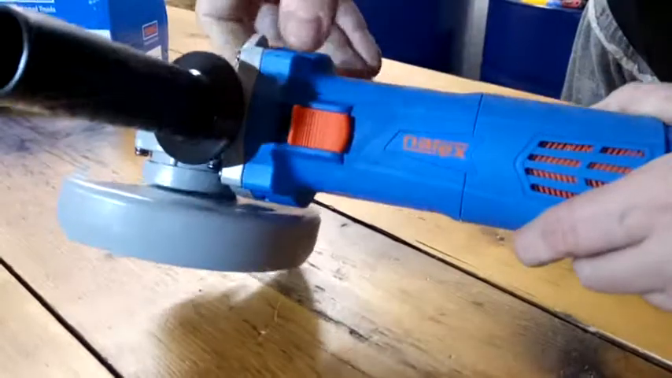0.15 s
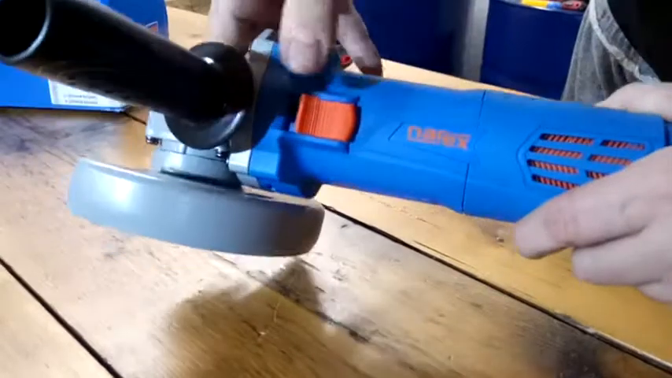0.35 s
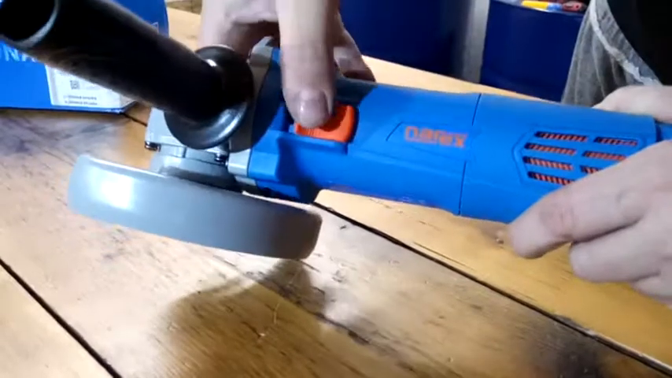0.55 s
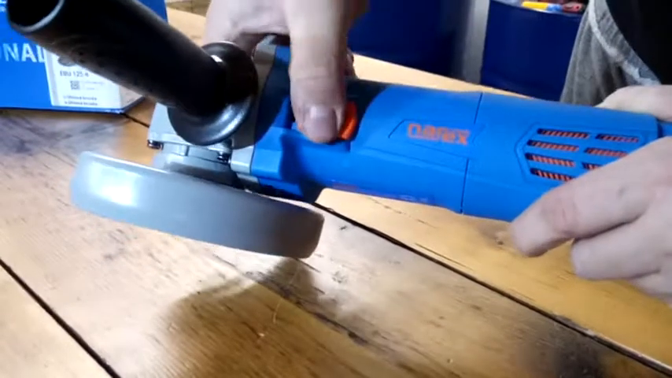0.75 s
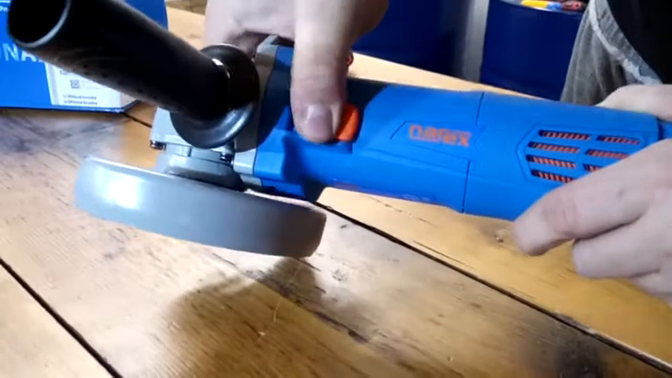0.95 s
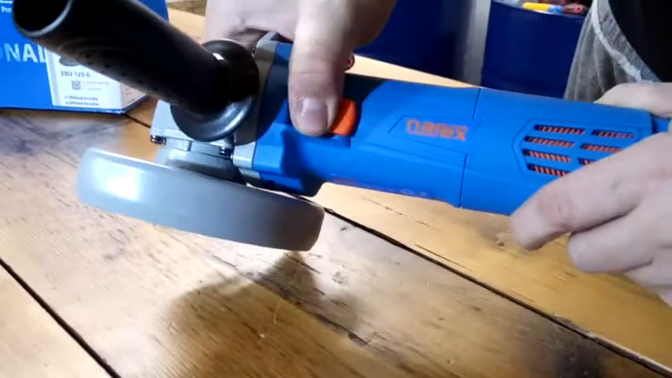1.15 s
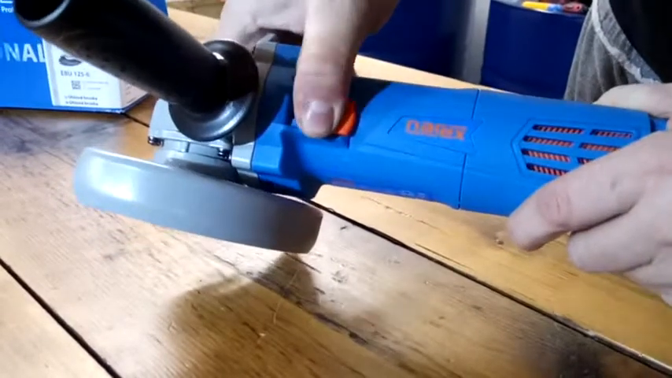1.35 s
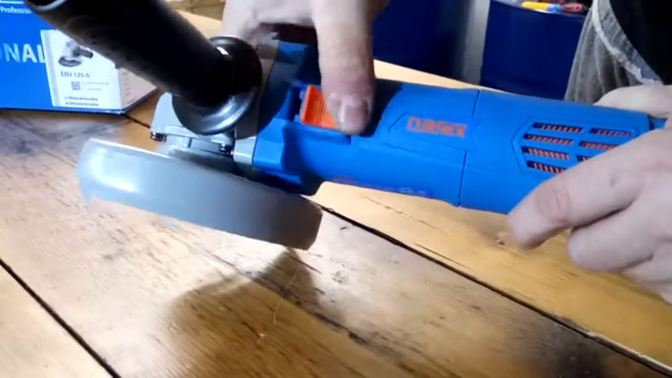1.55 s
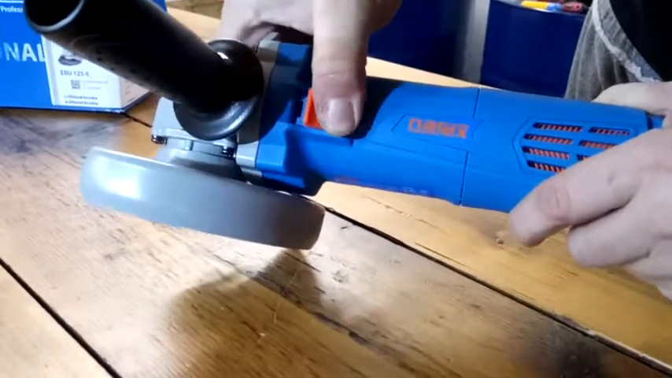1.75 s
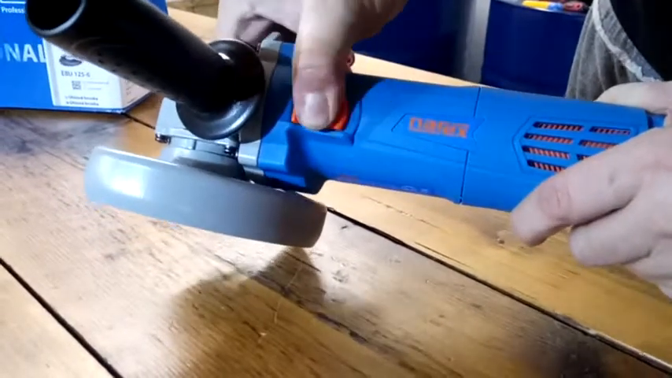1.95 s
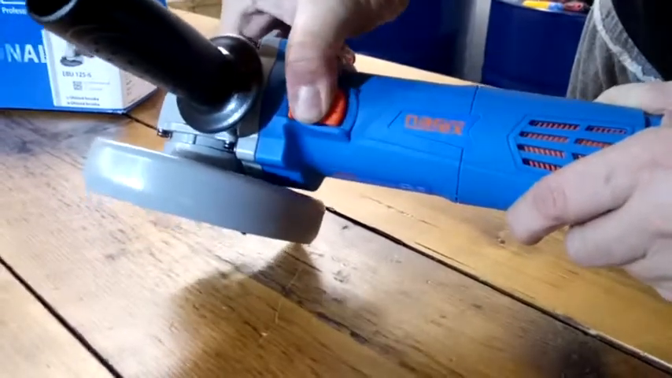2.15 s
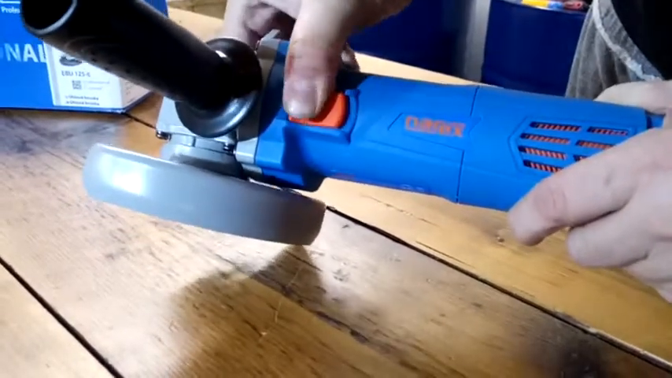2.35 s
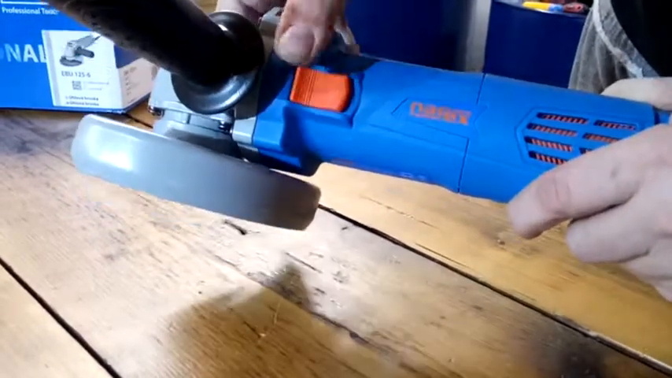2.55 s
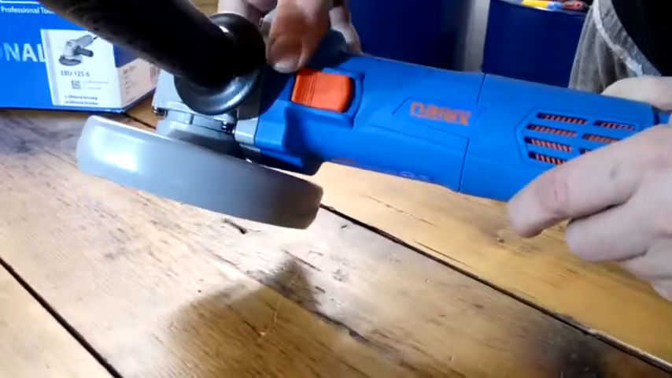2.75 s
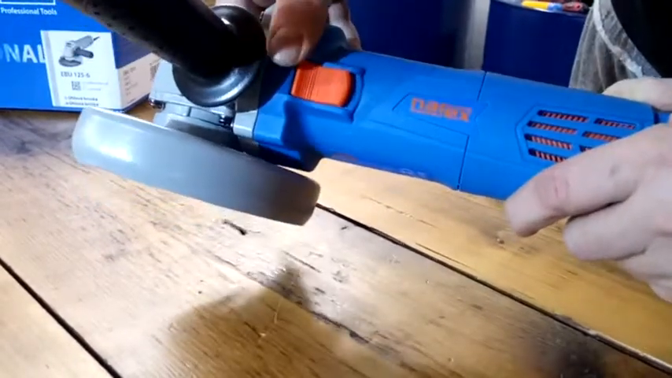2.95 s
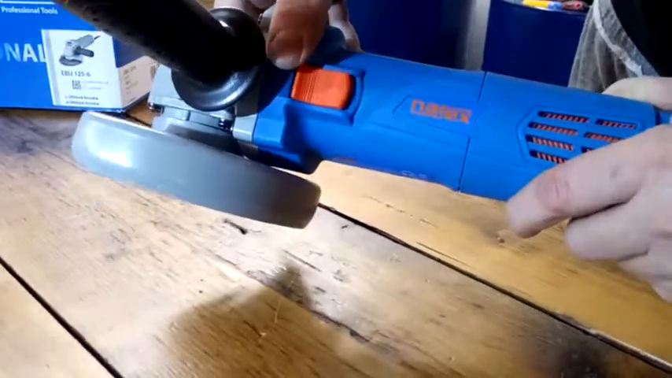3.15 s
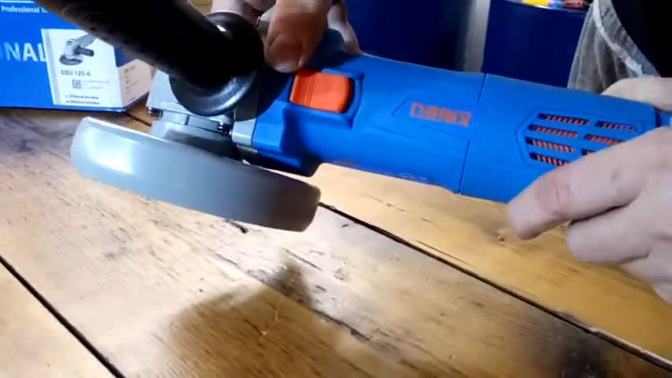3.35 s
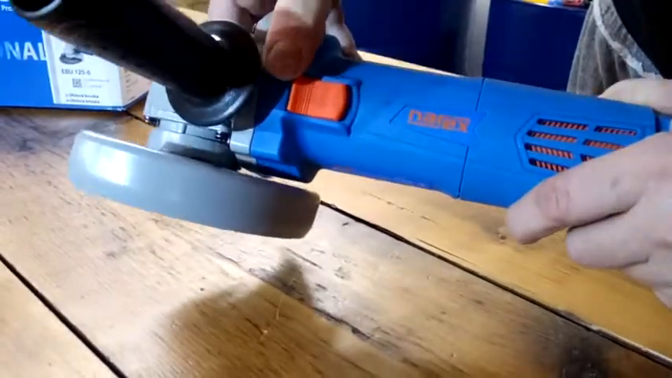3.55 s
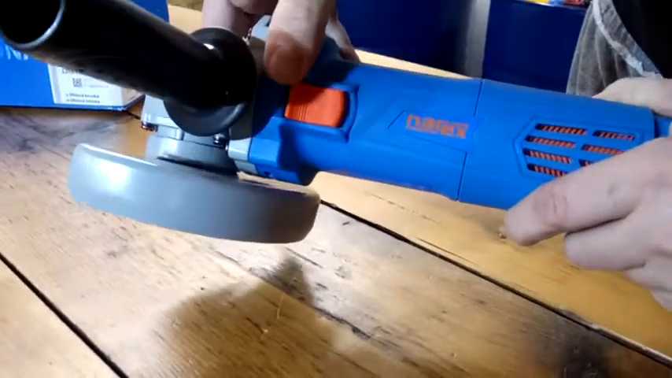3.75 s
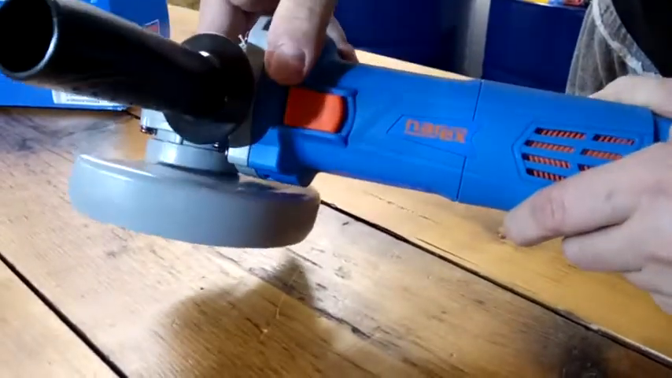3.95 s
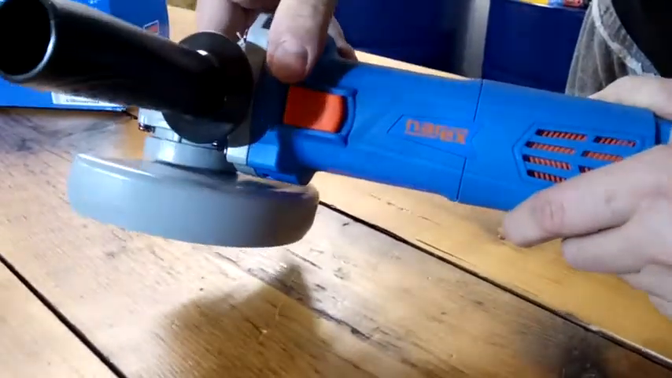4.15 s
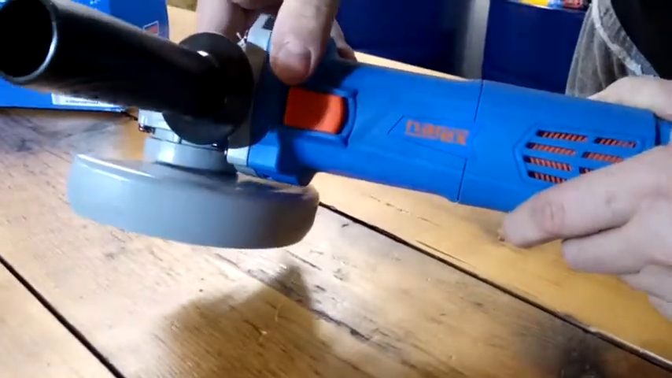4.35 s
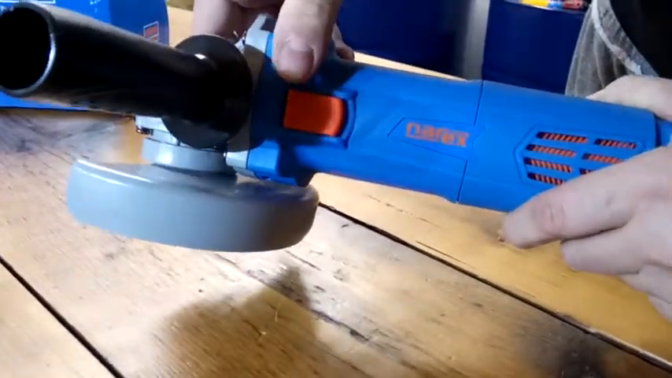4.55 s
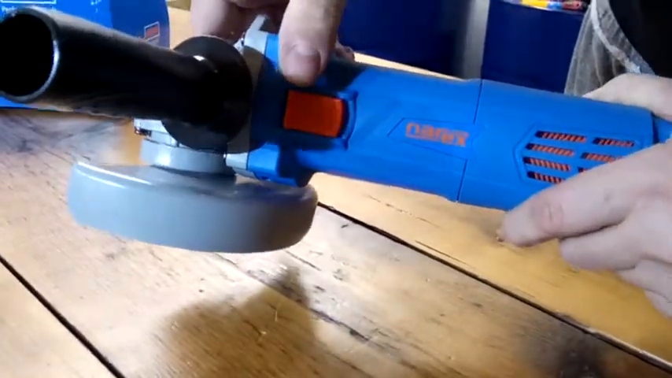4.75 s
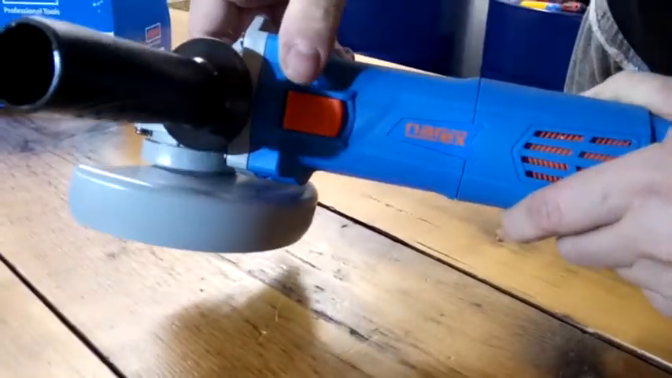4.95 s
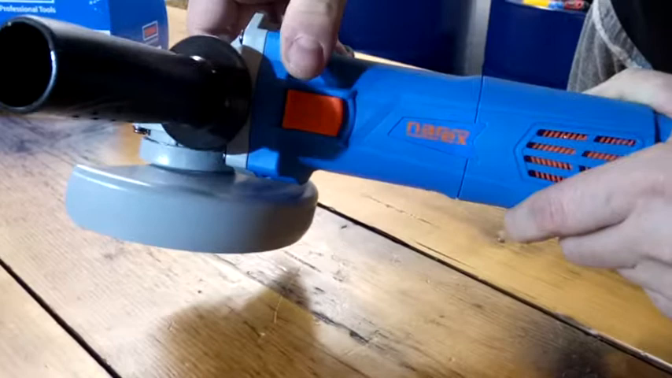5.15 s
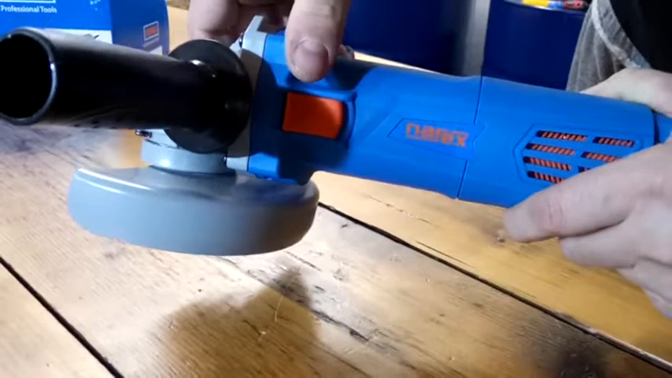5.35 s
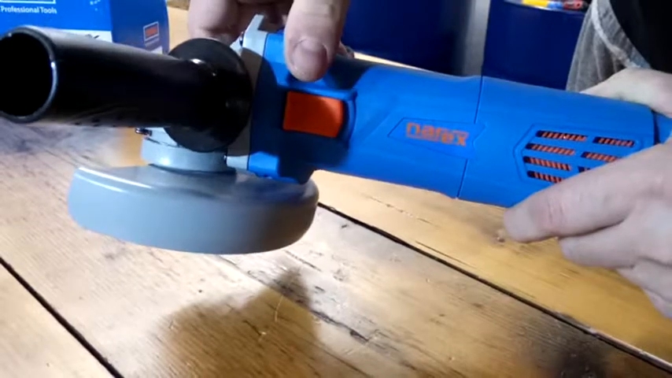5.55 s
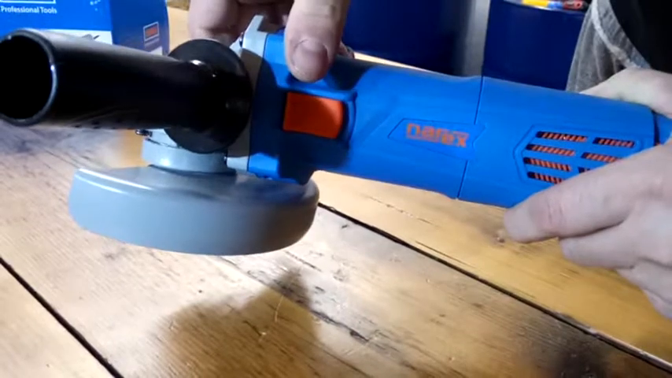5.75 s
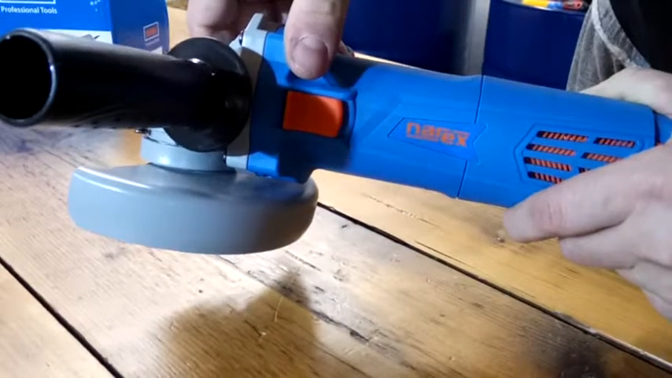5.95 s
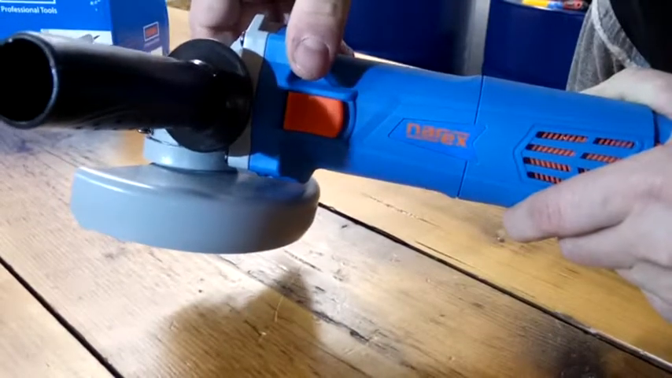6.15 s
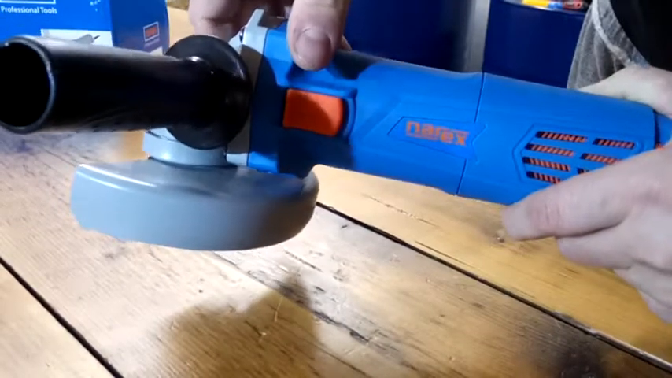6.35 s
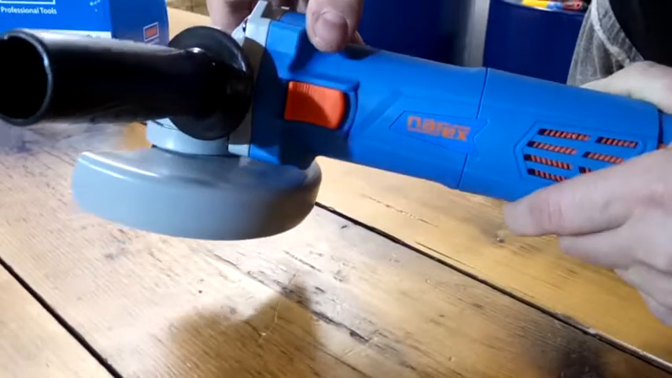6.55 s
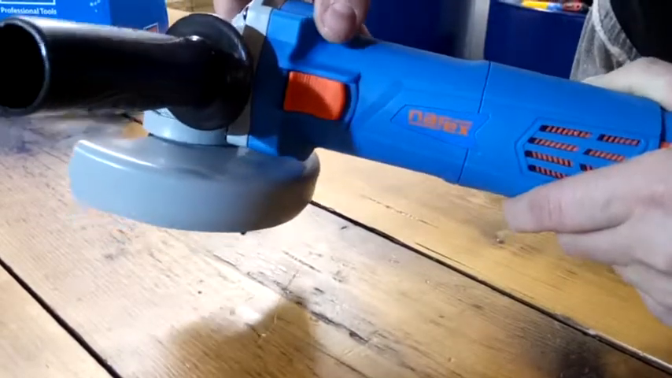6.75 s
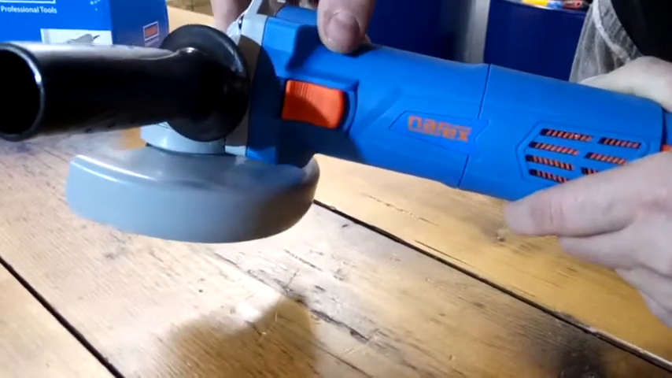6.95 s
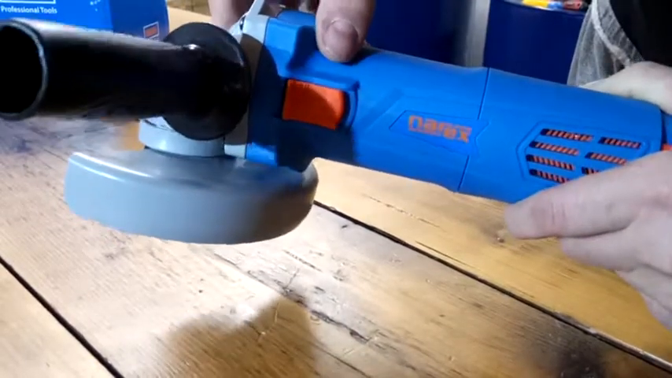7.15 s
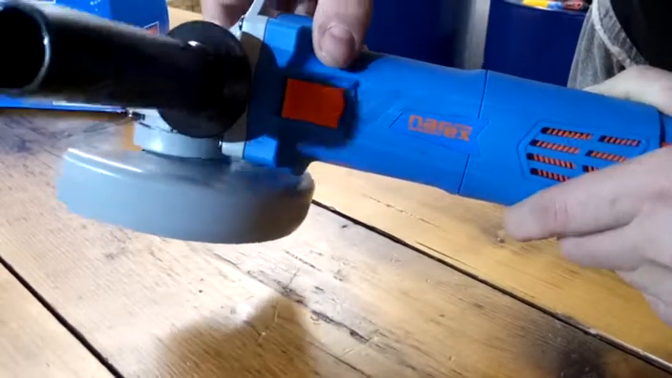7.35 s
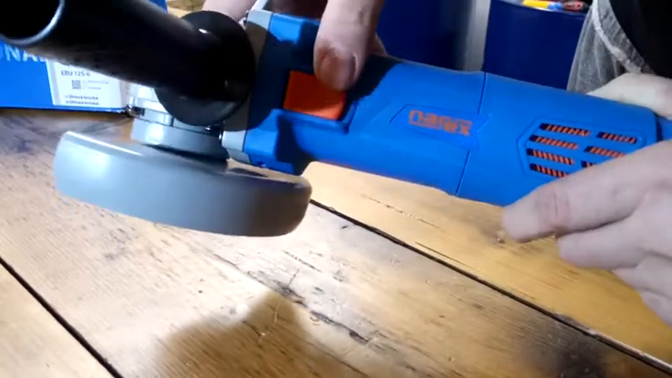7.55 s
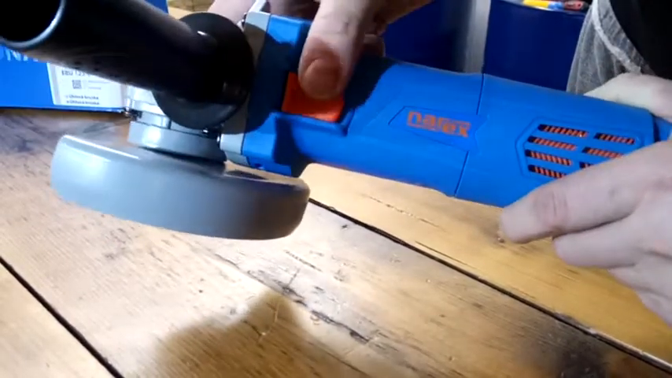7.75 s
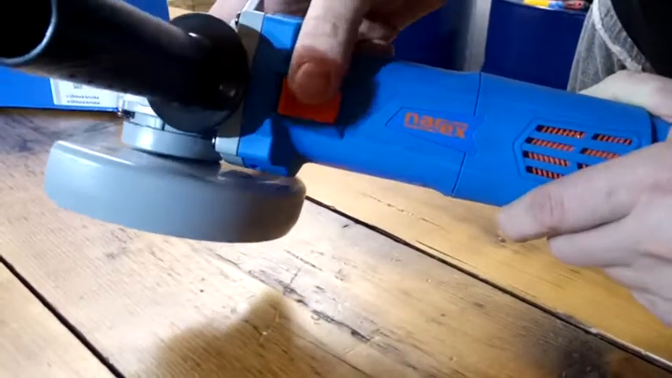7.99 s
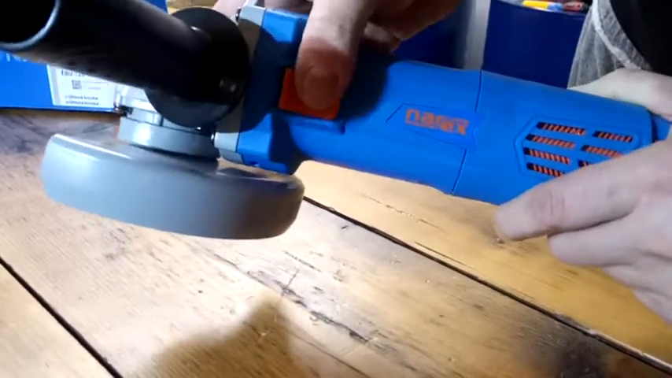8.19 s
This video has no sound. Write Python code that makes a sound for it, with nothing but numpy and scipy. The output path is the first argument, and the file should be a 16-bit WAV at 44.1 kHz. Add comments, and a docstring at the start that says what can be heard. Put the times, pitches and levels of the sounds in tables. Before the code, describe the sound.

A close recording at a wooden table in a small, slightly reverberant workshop. From 0 to about 0.8 s, the loose gears of a switched-off angle grinder rattle down, clacking slower, softer and duller until only single ticks remain. Hand thumps boom in the table top at about 0.15, 0.35, 0.9 and 1.2 s, with soft grip rumble and a faint thumb rub near 1.05 s. At about 1.48 s the switch gives a sharp plastic click. From 1.6 s the motor starts with a coarse buzzing judder, about a hundred jolts a second, and low hum, while a gear whine sweeps steeply upward. By about 2.5 s it is nearly at full speed, then settles into a loud, steady, bright metallic clatter with a mid-pitched shaft tone and fan rush. It continues to 8 s, fluttering slightly, its colour changing subtly after 7 s as the tool tilts.

```python
"""An angle grinder, held over a wooden table, rattles to a stop; hand thumps on the table, then the switch clicks on.
The soft starter jolts the gears about a hundred times a second and the gear whine sweeps up as the motor runs up.
At unloaded full speed a sine shaft tone sits under a bright gear clatter and the rush of the fan, both filtered noise.
Table thumps are decaying sines; clicks, rubs and grip rumble are noise bursts; a short room and quiet floor surround all."""
import sys
import numpy as np
from scipy import signal
from scipy.fft import rfft, irfft, next_fast_len
from scipy.io import wavfile
from scipy.ndimage import map_coordinates

SR = 44100
rng = np.random.default_rng(int(sys.argv[2]) if len(sys.argv) > 2 else 0)


def pcm_store(signal):
    """Save signal as 16-bit PCM."""
    levels = np.round(np.clip(np.atleast_2d(signal), -1, 1) * 32767)
    wavfile.write(sys.argv[1], SR, levels.astype(np.int16).T)


N = 362502
TIME_S = np.arange(N) / SR


def amp(db):
    """Decibels to gain."""
    return 10 ** (np.asarray(db) / 20)


def unit(x):
    """x at rms 1."""
    return x / np.sqrt(np.mean(x ** 2) + 1e-20)


def along(points, hz):
    """Interpolate (frequency [Hz], value) points on a log frequency axis."""
    f, v = np.transpose(points)
    return np.interp(np.log(hz + 1), np.log(f + 1), v)


def curves(rows, **ends):
    """One value per sample for each column after the time."""
    s, *cols = np.transpose(rows)
    return [np.interp(TIME_S, s, c, **ends) for c in cols]


def wobble(rate_hz):
    """Smooth random curve with rate_hz knots a second."""
    knots = rng.standard_normal(int(N * rate_hz / SR) + 4)
    return map_coordinates(knots, [np.arange(N) * rate_hz / SR])


def body(x, spectrum):
    """Radiate x through a minimum-phase filter of unit energy with this spectrum."""
    size = 8192
    gain = np.maximum(amp(along(spectrum, np.fft.rfftfreq(size, 1 / SR))), 1e-6)
    # folding the cepstrum makes the filter causal
    cepstrum = irfft(np.log(gain))
    cepstrum[1:size // 2] *= 2
    cepstrum[size // 2 + 1:] = 0
    ring = irfft(np.exp(rfft(cepstrum)))
    return signal.fftconvolve(x, ring / np.linalg.norm(ring))[:N]


def noise():
    """White noise of rms 1."""
    return rng.standard_normal(N)


def add(track, s, sound):
    """Lay a sound into the track at s seconds."""
    part = track[round(s * SR):][:len(sound)]
    part += sound[:len(part)]


def burst(t60, rise):
    """One second holding a dying puff of noise (times in s)."""
    t = np.arange(SR) / SR
    return amp(-60 * t / t60) * (1 - np.exp(-t / rise)) * rng.standard_normal(len(t))


def bursts(rows, rise):
    """Track with one puff for each (time [s], level [dB], t60 [s]) row."""
    track = np.zeros(N)
    for s, db, t60 in rows:
        add(track, max(s, 0), amp(db) * burst(t60, rise))
    return track


def impacts(rate_hz, scatter_db, t60):
    """Irregular tooth impacts, each a short burst (t60 in s); mean power 1 at any rate."""
    chance = np.clip(rate_hz / SR, 1e-4, 1)
    energy = unit(amp(scatter_db * np.clip(noise(), -2, 2))) ** 2
    blows = (rng.random(N) < chance) * energy / chance
    keep = amp(-60 / (t60 * SR)) ** 2
    return np.sqrt(signal.lfilter([1 - keep], [1, -keep], blows)) * noise()


def below(spin, edge):
    """1 well under the edge, falling smoothly to 0 above it."""
    return 1 / (1 + (spin / edge) ** 10)


# speeds in turns a second
FULL_HZ, CREEP_HZ, COAST_HZ = 591.2, 53.2, 145
FIRST_FIRING_S, STOP_S = 1.5959, .86
RAMP_S, RAMP_POWER = .442, 1.487
RUN_UP_S, CREEP_S = .2673, .949  # time constants: main run-up, slow last part
HALF_WAVE_HZ, TEETH = 100.7, 12


def rotor_speed():
    """Turns a second: friction brakes the rotor evenly; then the soft starter ramps up the drive."""
    ramp = np.clip((TIME_S - FIRST_FIRING_S) / RAMP_S, 0, 1) ** RAMP_POWER
    drive = np.cumsum(ramp) / SR
    missing = (FULL_HZ - CREEP_HZ) * np.exp(-drive / RUN_UP_S) + CREEP_HZ * np.exp(-drive / CREEP_S)
    rising = FULL_HZ - missing
    falling = COAST_HZ * np.clip(1 - TIME_S / STOP_S, 0, 1)
    return np.maximum(falling + rising, 1)


# spectrum of freewheeling gears: (frequency [Hz], relative level [dB])
LOOSE_GEARS = [(150, -31), (300, -19.5), (700, -11), (800, -16), (1000, -10), (2200, -11.5), (2450, -2),
               (2750, 1.5), (3400, 0.5), (3720, -10.5), (4500, -6.5), (4750, -2.5), (5250, -3.5),
               (5700, -9), (6150, -4.5), (6550, -8.5), (6850, -16.5), (7300, -24.5), (8900, -50)]
# single teeth knocking as the gears stop, before filtering: (time [s], level [dB])
TOOTH_TICKS = [(.32, -27), (.394, -29), (.494, -32), (.509, -31), (.612, -45), (.7325, -36)]
COAST_DB, COAST_POWER = -29.5, 1.03  # level falls as this power of speed
COAST_TREBLE_DB, DULLING_POWER = 3.5, 0.98  # gain above 4 kHz, falling likewise
SETTLE_HZ = 46  # turns a second; below it the teeth mostly stay in contact


def coasting(speed):
    """Unloaded teeth rattle in their play and clack about once a turn, softer and duller, down to ticks."""
    left = np.minimum(speed / COAST_HZ, 1) * (TIME_S < STOP_S)
    # teeth go on rocking in their play when the rotor has all but stopped
    rate_hz = speed + 25
    turns = np.cumsum(rate_hz) / SR + .15 * wobble(50)
    age_s = turns % 1 / rate_hz
    strength = amp(2.5 * noise())[np.floor(turns).astype(int)]
    clacks = strength * amp(-60 * age_s / .02) * noise()
    chatter = impacts(TEETH * rate_hz, scatter_db=4, t60=.005) + noise()
    level = amp(COAST_DB) * left ** COAST_POWER / (1 + (SETTLE_HZ / speed) ** 3)
    rattle = level * (1.9 * clacks + .5 * np.sqrt(left) * chatter)
    dull = signal.sosfiltfilt(signal.butter(4, 4000, fs=SR, output="sos"), rattle)
    rattle = dull + amp(COAST_TREBLE_DB) * left ** DULLING_POWER * (rattle - dull)
    tick_lowpass = signal.butter(2, 5000, fs=SR, output="sos")
    for s, db in TOOTH_TICKS:
        tick = amp(db) * burst(t60=.018, rise=.0005)
        add(rattle, s, signal.sosfilt(tick_lowpass, tick))
    return body(rattle, LOOSE_GEARS)


MISFIRE_DB = -11.5  # the second half-wave barely fires


def kicks(bounce_db, t60, rise):
    """Each mains half-wave slams the teeth together; they bounce until the next. Rms 1."""
    cycles = (TIME_S - FIRST_FIRING_S) * HALF_WAVE_HZ
    age_s = cycles % 1 / HALF_WAVE_HZ
    strength = amp(.6 * noise())[np.floor(cycles).astype(int)]
    strength = strength * amp(MISFIRE_DB * (np.floor(cycles) == 1))
    # teeth cross their play before they meet, a little differently each time
    meeting = np.floor(cycles - .06 + .008 * wobble(100))
    slams = np.diff(meeting, prepend=meeting[0])
    bounces = amp(-60 * age_s / t60) * (1 - np.exp(-age_s / rise)) * noise()
    return unit(strength * (unit(slams - np.mean(slams)) + amp(bounce_db) * unit(bounces)))


# strength of the mains jolts: (time [s], level [dB])
JOLT_LEVEL = [(1.6, -39.5), (1.625, -34), (1.675, -24.5), (1.81, -20), (1.84, -27), (1.93, -21.5),
              (2.03, -20), (2.12, -24), (2.7, -31)]
# gear case under starting torque: (frequency [Hz], relative level [dB])
STRAINED_CASE = [(1500, -30), (2250, -13.5), (2700, 2), (3050, -2), (3450, 0), (3720, -10.5), (4550, -5),
                 (4900, -1.5), (5400, 5), (5750, -2), (6100, 2.5), (6600, -1), (7100, -15.5), (7800, -38.5),
                 (9000, -52)]
# plastic housing under starting torque: (frequency [Hz], relative level [dB])
HOUSING_THUD = [(80, -31.5), (250, -5.5), (400, -8.5), (600, -1.5), (850, -7.5), (1100, 2), (1350, -3),
                (1600, -7.5), (1900, -4.5), (2300, -12.5), (3200, -42.5)]
THUD_DB, THUD_FADE_DB = -7, 21.5  # relative to the jolts; loss from rest to full speed


def jolts(speed):
    """Mains pulses hammer the gear case; while the rotor is slow they thud roughly in the housing too."""
    strength = amp(curves(JOLT_LEVEL)[0]) * (TIME_S > FIRST_FIRING_S)
    hard = strength * kicks(bounce_db=3, t60=0.017, rise=.0005)
    soft = strength * kicks(bounce_db=8, t60=0.024, rise=.0005)
    thud_gain = amp(THUD_DB - THUD_FADE_DB * speed / FULL_HZ)
    return body(hard, STRAINED_CASE) + body(thud_gain * soft, HOUSING_THUD)


# gear case in free running: (frequency [Hz], relative level [dB])
GEAR_CASE = [(2060, -34.5), (3500, -6), (4060, -1.5), (4470, 1), (6010, 2.5), (6890, -7.5), (7220, -13),
             (8090, -33), (8880, -39.5), (11500, -66), (19500, -120)]
# steel guard: (frequency [Hz], relative level [dB])
STEEL_GUARD = [(1240, -36.5), (2100, -15.5), (2610, 0), (3800, -6), (4940, -37), (8360, -120)]
# fan rush: (frequency [Hz], relative level [dB])
FAN_RUSH = [(30, -41.5), (80, -29.5), (150, -20), (300, -5.5), (480, -6), (750, -1), (1000, 3), (1200, 0.5),
            (1450, 3.5), (1700, 5), (2050, 0.5), (2400, -2), (3000, -27.5), (5000, -75.5)]
CASE_DB, GUARD_DB, FAN_DB = -18, -23.5, -28  # at full speed, untilted, before the metal resonances
CLATTER_POWER, FAN_POWER = 0.93, .2  # gain grows as these powers of speed
FAN_STALL_SPIN = 0.53  # share of full speed under which the fan moves little air
TILT_CASE_DB, TILT_GUARD_DB, TILT_FAN_DB = -1, 2, -1.5  # change at full tilt


def running(speed, tilt):
    """Gear impacts ring the case and the guard over the fan's rush; all grow with the speed."""
    spin = speed / FULL_HZ
    powered = TIME_S > FIRST_FIRING_S
    flutter_db = .4 * wobble(45) + 0.5 * wobble(8.3)
    guard_flutter_db = flutter_db + 0.34 * wobble(14)

    def teeth():
        return 0.62 * impacts(TEETH * speed / 2, scatter_db=1.0, t60=.003) + 0.8 * noise()

    case = amp(CASE_DB + TILT_CASE_DB * tilt + flutter_db) * body(teeth(), GEAR_CASE)
    guard = amp(GUARD_DB + TILT_GUARD_DB * tilt + guard_flutter_db) * body(teeth(), STEEL_GUARD)
    fan = amp(FAN_DB + TILT_FAN_DB * tilt) * body(noise(), FAN_RUSH)
    airflow = spin ** FAN_POWER * (1 - below(spin, FAN_STALL_SPIN))
    return powered * (spin ** CLATTER_POWER * (case + guard) + airflow * fan)


# resonances of guard and gear case: (frequency [Hz], width [Hz], mean gain over the broad colour [dB])
METAL_MODES = [(2465, 48, 3), (2670, 76, 0.5), (3380, 140, 3), (4464, 69, 0.5), (4770, 78, -5),
               (5070, 200, -0.5), (6070, 71, 0), (6520, 140, 2)]


def metal(x):
    """Metal parts color any clatter at their own resonances; each swells and fades as the tool sways."""
    m = next_fast_len(N + SR // 2)
    f, spectrum = np.fft.rfftfreq(m, 1 / SR), rfft(x, m)
    out = x
    for hz, width, db in METAL_MODES:
        bandpass = 1j * f * width / (hz * hz - f * f + 1j * f * width)
        ring = irfft(spectrum * bandpass, m)[:N]
        sway_db = 1.3 * wobble(2.5)
        out = out + (amp(db + sway_db) - 1) * ring
    return amp(-1.22) * out


SING_DB, SING_HZ, SING_WIDTH_HZ = -27, 4100, 900  # mesh-tone range that excites the guard


def guard_ring(speed):
    """As the mesh sweeps past it, one resonance of the guard sings out."""
    near = np.exp(-.5 * ((TEETH * speed - SING_HZ) / SING_WIDTH_HZ) ** 2)
    near = near * (TIME_S > FIRST_FIRING_S)
    # (frequency [Hz], relative level [dB])
    resonance = [(2500, -51.5), (3100, -14.5), (3230, 2), (3420, -2.5), (3560, -18), (4200, -51.0)]
    return amp(SING_DB) * near * body(noise(), resonance)


# spindle, bearing and rotor lines: (multiple of rotor speed, mean rms level at full speed [dB])
ROTOR_LINES = [(.27, -59), (4.272, -41), (5.08, -39), (9, -40), (10, -40), (11, -45)]
# mesh tone as the gear case radiates it: (frequency [Hz], mean rms level [dB])
MESH_RADIATION = [(1000, -75), (2000, -46), (2650, -29.5), (3400, -28.5), (4200, -27), (5000, -28),
                  (5600, -25.5), (6400, -26.5), (6690, -30.5), (6820, -40), (7100, -47)]
SHAFT_DB, TILT_SHAFT_DB = -30.5, -1.3  # at resonance and full speed; change at full tilt
HOUSING_HZ, HOUSING_WIDTH_HZ = 556.5, 48.4  # resonance the shaft tone runs through
# mesh phase shake: extra while speeding up, always, share of full speed where the extra ends
SHAKE_RAD, STEADY_SHAKE_RAD, SHAKE_END_SPIN = .9, .22, .7


def whine(speed, tilt):
    """Rotor unbalance gives the shaft tone; bearings and the torque-shaken tooth mesh add higher lines."""
    angle = 2 * np.pi * np.cumsum(speed * (1 + .0008 * wobble(12))) / SR
    spin = speed / FULL_HZ
    resonance = 1 / np.hypot(1, 2 * (speed - HOUSING_HZ) / HOUSING_WIDTH_HZ)
    shaft_gain = amp(SHAFT_DB + TILT_SHAFT_DB * tilt + 0.55 * wobble(11))
    shaft = shaft_gain * resonance * spin ** 2 * np.sin(angle)
    lines = sum(amp(db + 2.5 * wobble(11)) * np.sin(multiple * angle + 0.61 * wobble(25))
                for multiple, db in ROTOR_LINES)
    torque = np.sin(2 * np.pi * HALF_WAVE_HZ * TIME_S)
    shake_rad = STEADY_SHAKE_RAD + SHAKE_RAD * below(spin, SHAKE_END_SPIN)
    mesh_phase = TEETH * angle + shake_rad * (torque + wobble(330))
    mesh = amp(along(MESH_RADIATION, TEETH * speed) + wobble(40)) * np.sin(mesh_phase)
    loaded = TIME_S > FIRST_FIRING_S
    return np.sqrt(2) * (shaft + spin ** 6 * lines + loaded * mesh)


# stator hum overtones: (multiple of the half-wave rate, mean relative level [dB])
HUM_OVERTONES = [(1, -5.5), (2, -3), (3, -8.5), (4, -15), (5, -17)]
HUM_DB, HUM_RISE_S = -40.5, .015
HUM_END_SPIN = .36  # share of full speed up to which the starting current lasts


def stator(speed):
    """The heavy, uneven starting current makes the iron hum until the rotor picks up speed."""
    angle = 2 * np.pi * HALF_WAVE_HZ * TIME_S
    hum = np.zeros(N)
    for k, db in HUM_OVERTONES:
        phase = 0.28 * k * wobble(22) + 2 * np.pi * rng.random()
        hum += amp(db + 2.0 * wobble(25)) * np.sin(k * angle + phase)
    rise = 1 - np.exp(-np.maximum(TIME_S - FIRST_FIRING_S, 0) / HUM_RISE_S)
    current = rise * below(speed / FULL_HZ, HUM_END_SPIN)
    return amp(HUM_DB) * current * unit(hum)


# hand on the table, relative gains: (time [s], boom level [dB], knock level [dB])
TABLE_THUMPS = [(.149, -34, -41), (0.345, -33.5, -34), (0.903, -32.5, -37.5), (1.218, -36.5, -40.5),
                (1.504, -47, -48)]
# table-top modes: (frequency [Hz], mean relative level [dB], t60 [s])
TABLE_MODES = [(72.4, 2.5, 0.31), (90.5, -2, 0.3), (133, -2, 0.31), (161, -9, 0.3), (206, -4, 0.19),
               (258, -9, 0.22), (331, -8.5, 0.45), (385, -10.5, 0.29), (558, -14.5, 0.27), (703, -5, 0.14),
               (1060, -17.5, 0.17), (1130, -20, 0.13), (1380, -26, 0.247), (5100, -33, .25)]
# knock spectrum: (frequency [Hz], relative level [dB])
KNOCK_COLOUR = [(80, -5.5), (300, 5), (720, -11), (850, -19), (1130, 1), (1280, -15), (1450, -5),
                (2200, -24), (2900, -16), (3350, -9), (3900, -25), (4700, -20), (5150, -14), (5700, -32),
                (6500, -41), (8500, -59.5)]
# thumb and switch: (time [s], level [dB], t60 [s])
SWITCH_CLICKS = [(1.02, -45, 0.022), (1.477, -18.5, 0.023), (1.509, -46, 0.034)]
# click spectrum: (frequency [Hz], relative level [dB])
PLASTIC_SHELL = [(200, -15), (650, -28), (880, -4), (1100, -17), (1700, -9), (2050, -18), (2400, -7),
                 (3400, -3.5), (3850, 3), (4250, -3.5), (5600, -5), (6200, 2), (7200, -2), (7900, -19.5),
                 (9000, -35)]
# thumb sliding on the housing: (time [s], level [dB], t60 [s])
THUMB_RUBS = [(1.005, -62, .35), (1.075, -54.5, .2), (1.482, -49, 0.38)]


def handling():
    """Knocks that boom in the table top and leave a faint buzz, plastic clicks and a sliding thumb."""
    booms, knocks = np.zeros((2, N))
    t = np.arange(SR // 2) / SR
    for s, boom_db, knock_db in TABLE_THUMPS:
        ring = sum(amp(level + rng.normal(0, 0.5) - 60 * t / t60)
                   * np.sin(2 * np.pi * (hz * t + rng.random())) for hz, level, t60 in TABLE_MODES)
        add(booms, s, amp(boom_db) * ring * (1 - np.exp(-t / 0.001)))
        crack = burst(t60=0.017, rise=.0008)
        buzz = burst(t60=0.45, rise=0.0042)
        add(knocks, s, amp(knock_db) * (amp(12) * crack + amp(-12) * buzz))
    clicks = bursts(SWITCH_CLICKS, rise=.0005)
    # (frequency [Hz], relative level [dB])
    rub_colour = [(500, -7), (3000, -6.5), (6000, 6), (7500, -9), (9000, -23.5)]
    rub = body(bursts(THUMB_RUBS, rise=0.011), rub_colour)
    return booms + body(knocks, KNOCK_COLOUR) + body(clicks, PLASTIC_SHELL) + rub


# soft low rumbles: (time [s], level [dB], t60 [s]); the first comes with the coasting gears, the rest from
# hands shifting their grip
LOW_RUMBLES = [(0, -46.5, 1.2), (.475, -41.5, 0.4), (.97, -43.5, 0.33), (1.5, -45, 1.1)]


def grip():
    """The coasting gears at first, then shifting hands, make the tool and the table rumble softly."""
    # (frequency [Hz], relative level [dB])
    rumble = [(25, -9), (75, 2.5), (160, -3.0), (330, -9), (700, -13.5), (1200, -27), (3000, -58)]
    return body(bursts(LOW_RUMBLES, rise=0.01), rumble)


# room decay: (frequency [Hz], t60 [s])
ROOM_DECAY = [(100, 0.63), (1000, 0.72), (7000, 0.47)]


def room(x):
    """The workshop's short, diffuse answer: convolution with noise that decays by frequency."""
    hz, t, z = signal.stft(rng.standard_normal(SR // 2), SR, nperseg=256)
    decay = amp(-60 * t / along(ROOM_DECAY, hz)[:, None])
    tail = signal.istft(z * decay, SR, nperseg=256)[1]
    return signal.fftconvolve(x, tail / np.linalg.norm(tail))[:N]


# tool turned in the hand: (time [s], tilt [0 level to 1 guard towards the listener])
TOOL_TILT = [(2.5, 0.043), (3.3, 0.045), (4.0, .1), (6.5, 0.078), (7.3, 0.49), (7.9, 1)]
# background floor: (frequency [Hz], relative level [dB])
FLOOR_COLOUR = [(25, -11), (80, -2.5), (200, -1.5), (600, -10), (2000, -22), (6000, -16.5), (9000, -52)]


def scene():
    """The grinder close by, its room and a quiet floor."""
    speed = rotor_speed()
    tilt, = curves(TOOL_TILT)
    gears = metal(coasting(speed) + jolts(speed) + running(speed, tilt))
    clatter = gears + guard_ring(speed) + handling() + grip()
    tones = whine(speed, tilt) + stator(speed)
    floor = amp(-70) * body(noise(), FLOOR_COLOUR)
    return (clatter + amp(-12.0) * room(clatter) + tones + floor)[None]


TOP_HZ = 9050


def record(dry):
    """The recorder rounds off the highest peaks and keeps nothing above its band limit."""
    rounded = dry / (1 + np.abs(dry / .62) ** 8) ** (1 / 8)
    m = next_fast_len(N + SR // 2)
    return irfft(rfft(rounded, m) * (np.fft.rfftfreq(m, 1 / SR) < TOP_HZ), m)[..., :N]


dry = scene()
out = record(dry)
pcm_store(out)
```